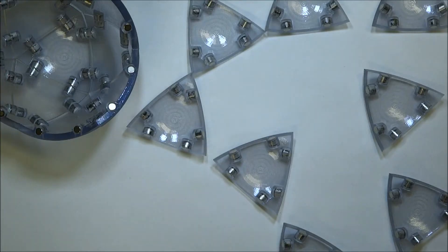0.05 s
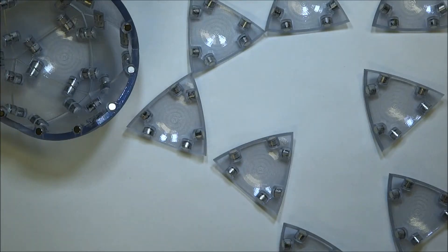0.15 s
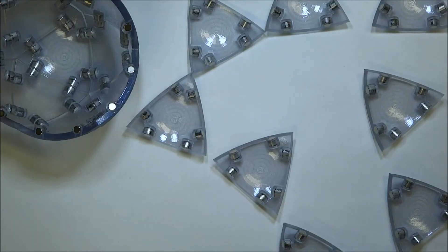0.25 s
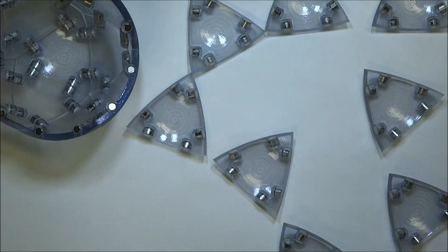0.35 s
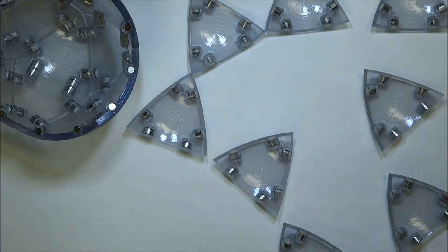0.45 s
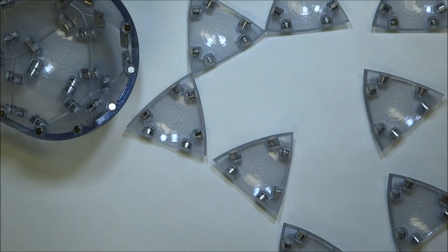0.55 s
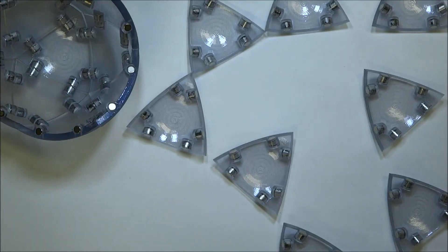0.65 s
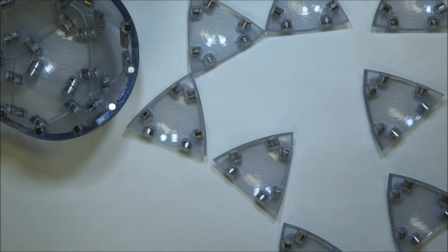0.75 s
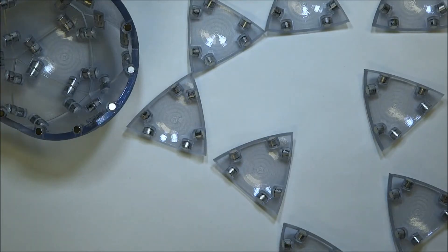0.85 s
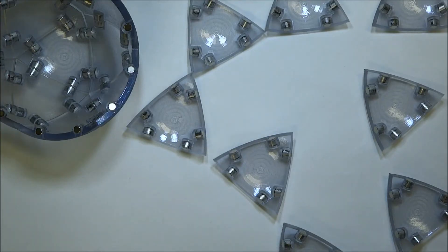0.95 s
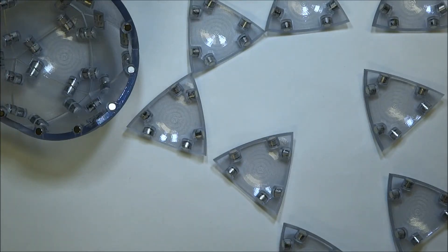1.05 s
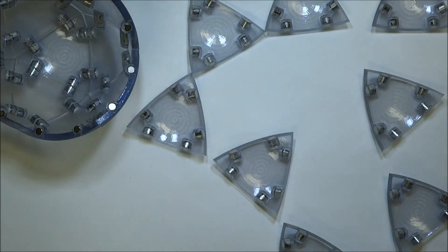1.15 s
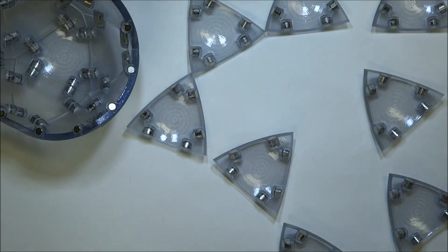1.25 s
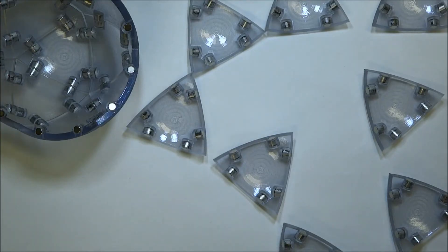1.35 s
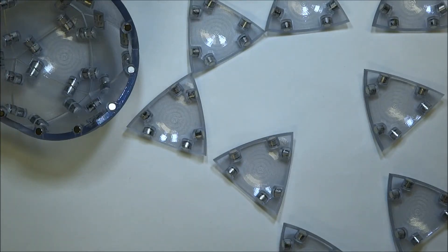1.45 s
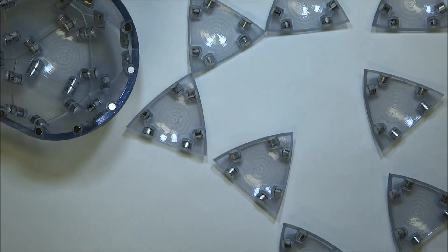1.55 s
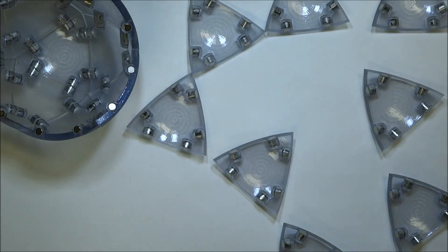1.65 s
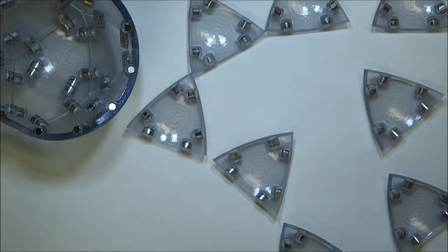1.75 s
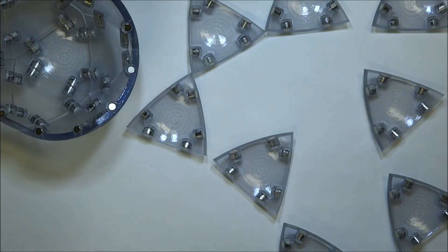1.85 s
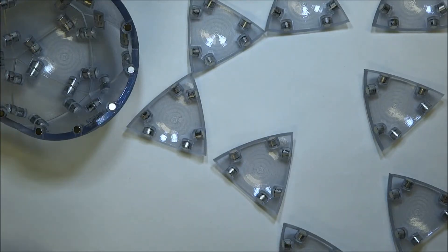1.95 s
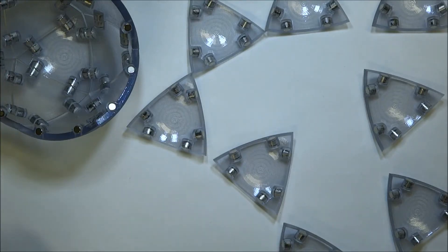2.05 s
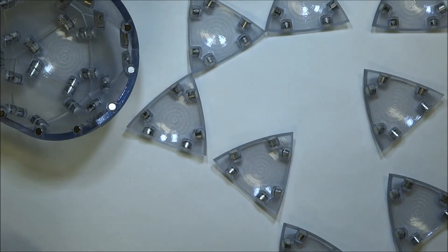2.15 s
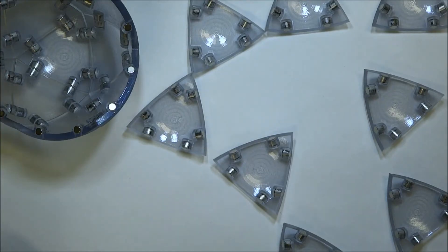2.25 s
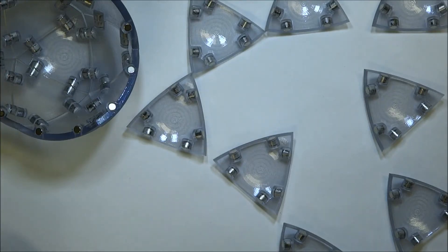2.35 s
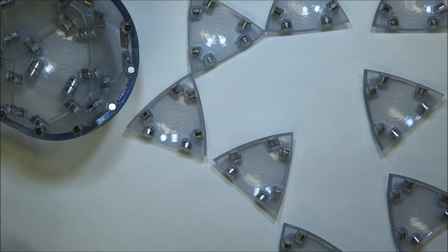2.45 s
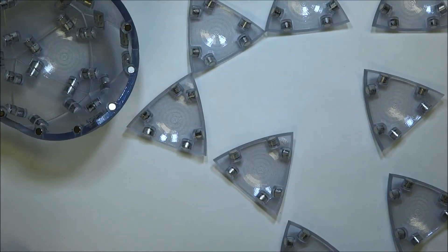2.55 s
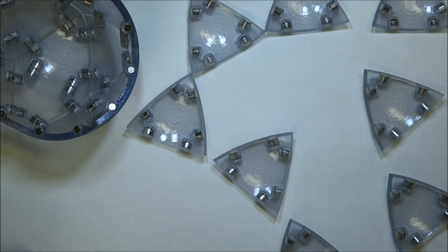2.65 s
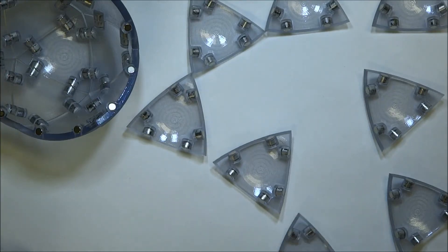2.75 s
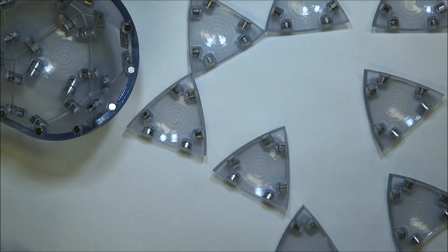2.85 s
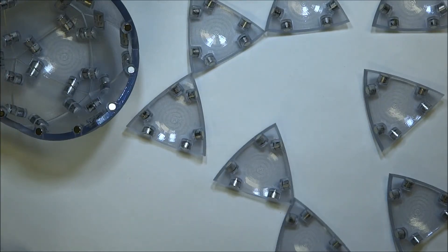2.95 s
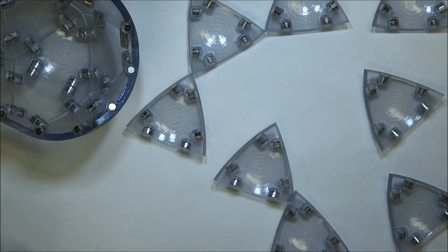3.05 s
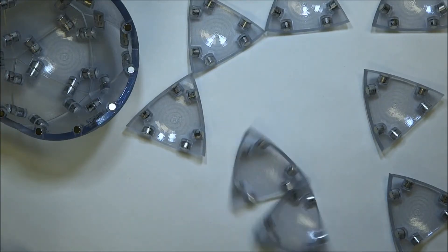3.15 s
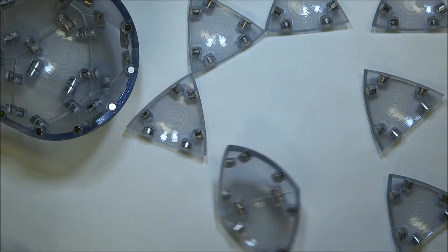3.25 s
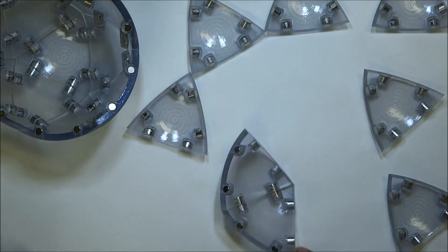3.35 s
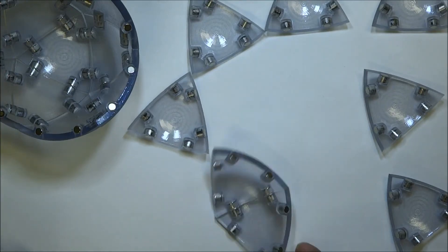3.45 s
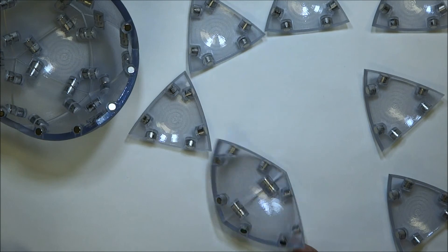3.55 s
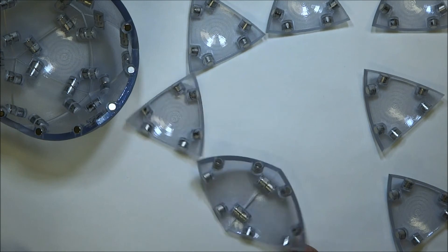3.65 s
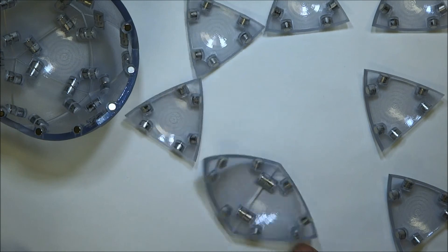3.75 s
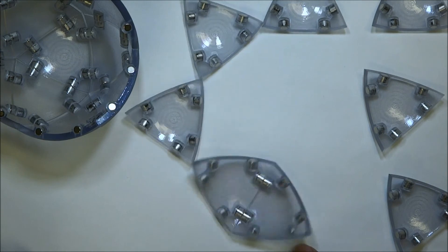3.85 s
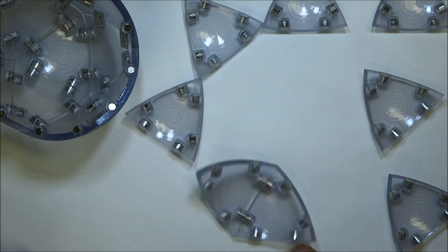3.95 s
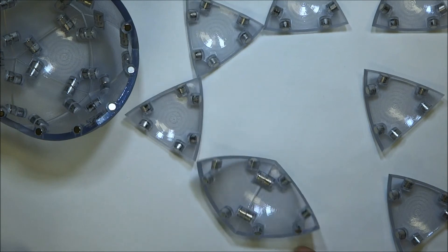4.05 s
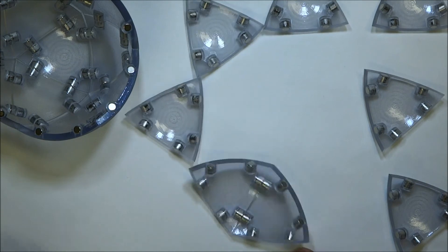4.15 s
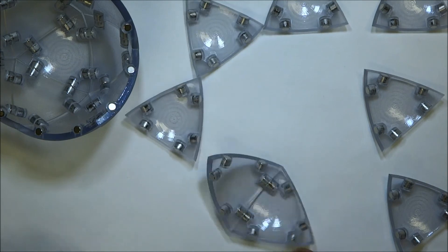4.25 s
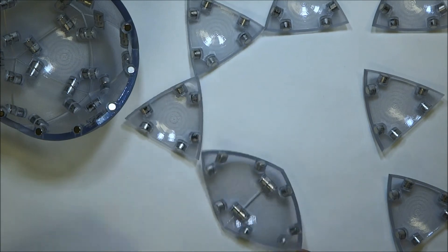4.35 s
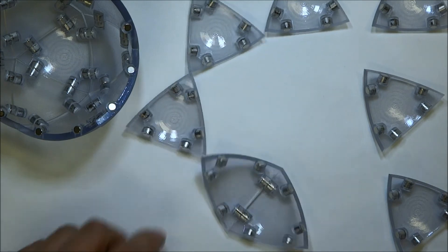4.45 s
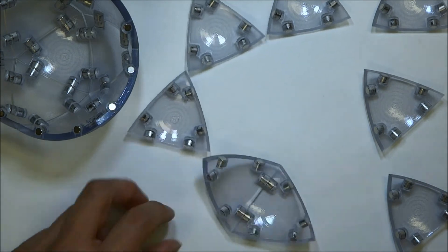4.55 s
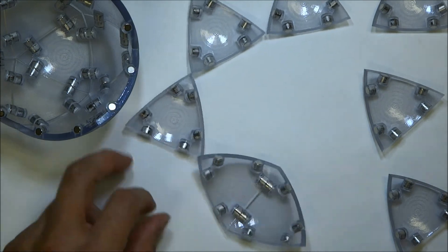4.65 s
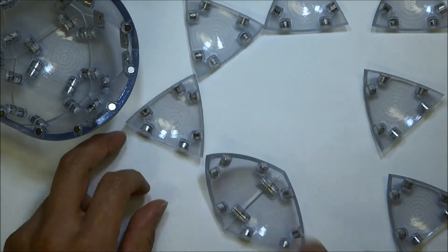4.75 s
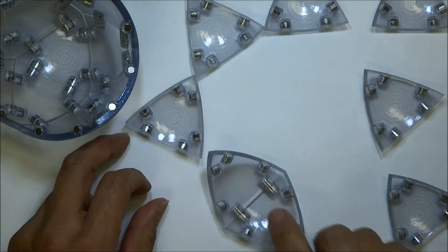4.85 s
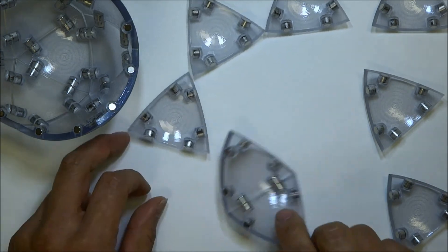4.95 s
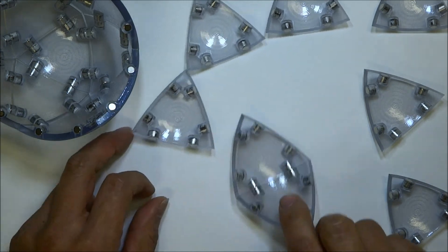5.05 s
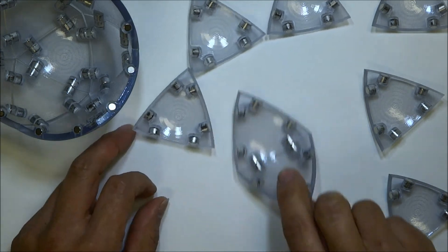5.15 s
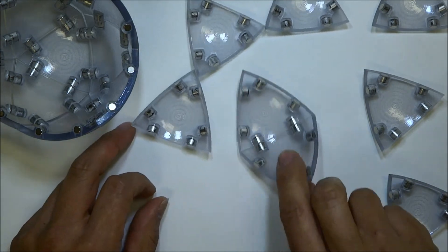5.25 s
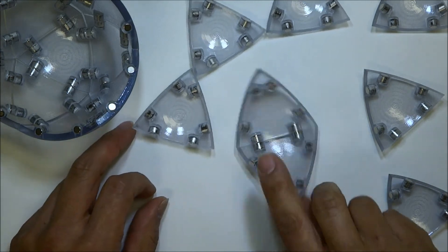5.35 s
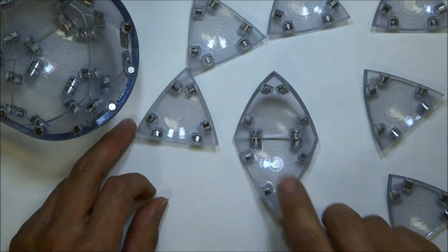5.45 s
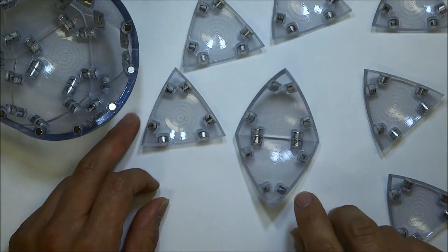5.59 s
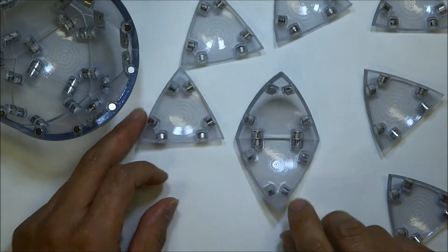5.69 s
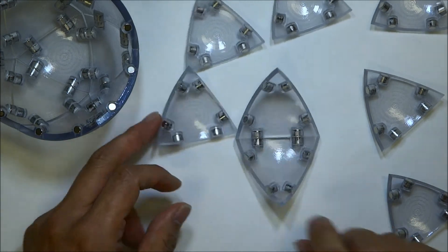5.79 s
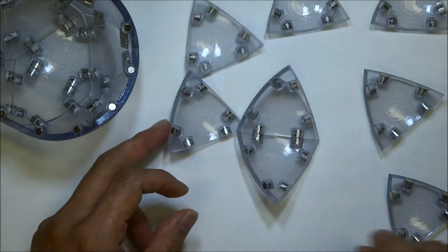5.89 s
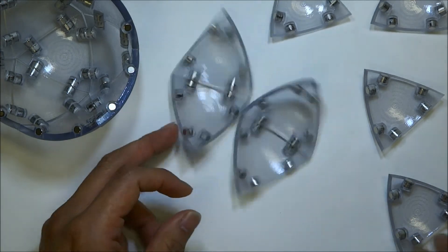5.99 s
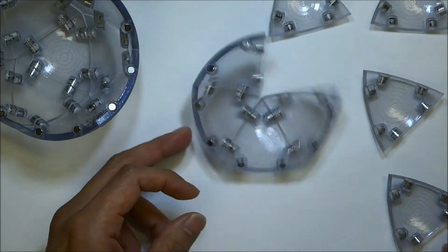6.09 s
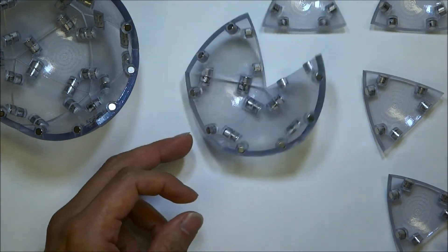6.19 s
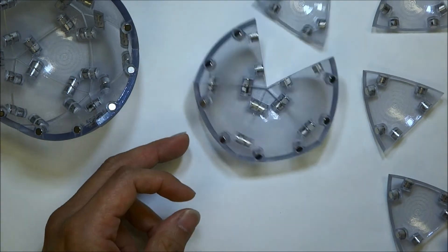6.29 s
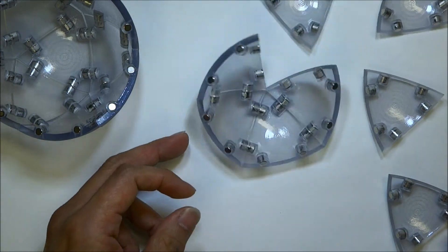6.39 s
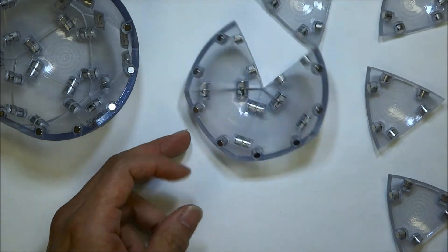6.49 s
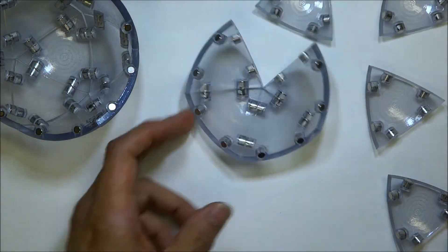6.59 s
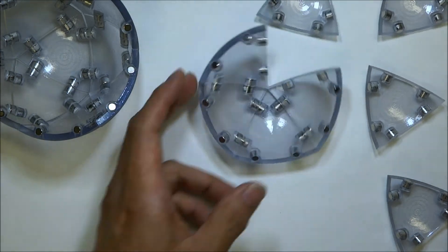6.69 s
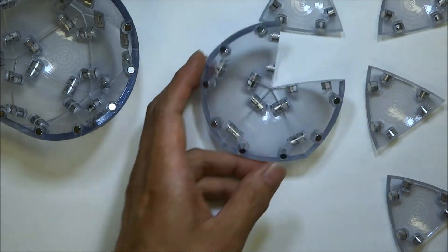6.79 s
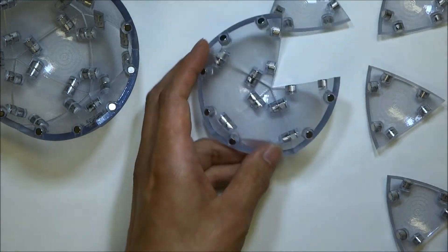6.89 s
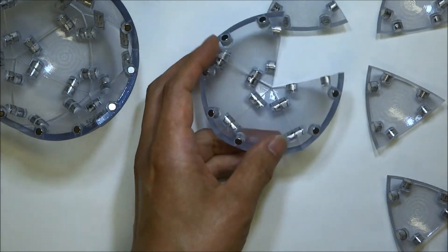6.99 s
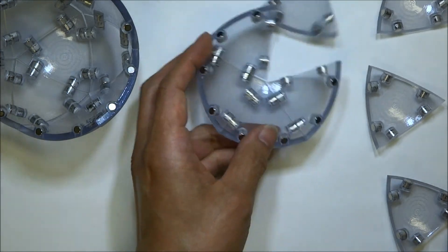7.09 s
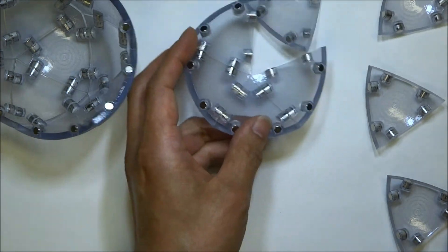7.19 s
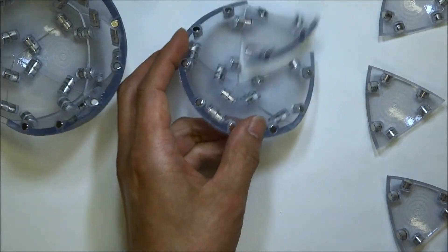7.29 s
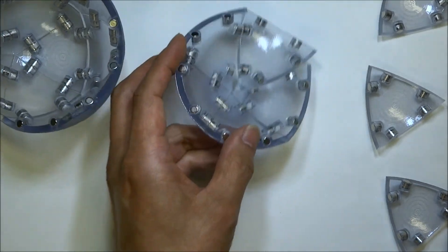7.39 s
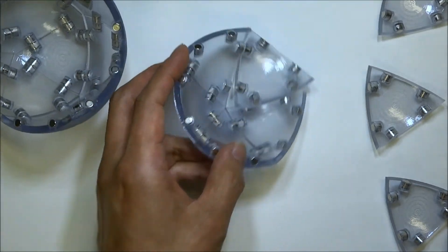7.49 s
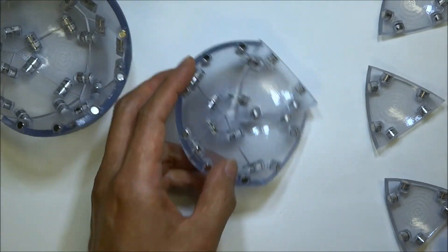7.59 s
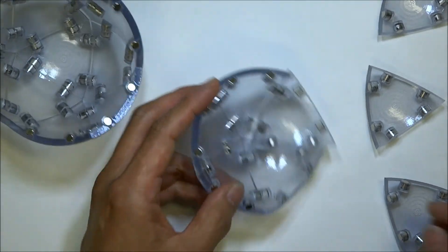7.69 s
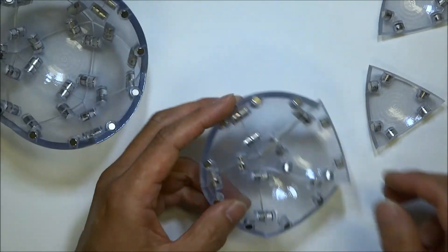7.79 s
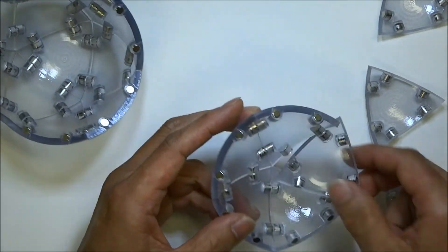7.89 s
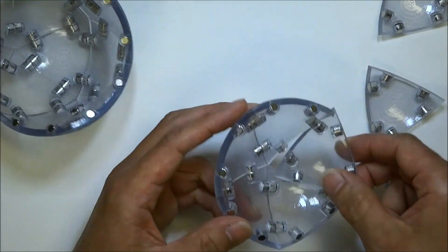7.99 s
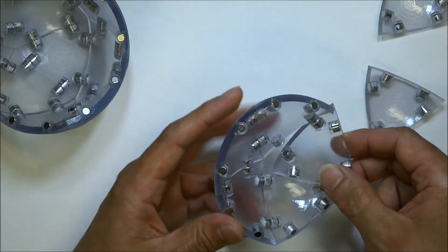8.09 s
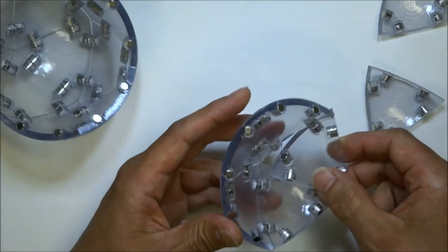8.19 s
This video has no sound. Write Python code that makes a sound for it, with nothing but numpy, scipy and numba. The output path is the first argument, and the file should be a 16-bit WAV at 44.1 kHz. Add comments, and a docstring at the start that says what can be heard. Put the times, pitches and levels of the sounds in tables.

```python
"""Curved plastic panels with steel magnets snap together, and rock and tap on a tabletop: each blow excites
decaying modes of plastic, magnets and table. Fingers and panels slide with dense, uneven slips of noise.
A machine fan hums and hisses nearby, as coloured air noise; thin wavering tones lie in the background.
A small hard room answers the handling with dense, decaying noise echoes.
The camera limits the loud snaps and then turns its gain down, recovering slowly."""
import sys
import numpy as np
from scipy import signal
from scipy.fft import rfft, irfft, next_fast_len
from scipy.io import wavfile
from scipy.ndimage import uniform_filter1d, minimum_filter1d
from numba import njit

SR = 44100
rng = np.random.default_rng(int(sys.argv[2]) if len(sys.argv) > 2 else 0)


def gain_from_db(level_db):
    """Convert decibel levels to linear amplitude factors (20 dB per decade)."""
    decades = np.asarray(level_db, float) / 20
    return 10 ** decades


def dump_mix(stems):
    """Bounce the given channels to the path in sys.argv[1] as a 16-bit WAV at rate SR."""
    frames = np.atleast_2d(stems).T  # one column per channel
    limited = np.clip(frames, -1, 1)  # hard clip at full scale
    pcm = np.round(limited * 32767).astype(np.int16)
    wavfile.write(sys.argv[1], SR, pcm)


N = 362943
T = np.arange(N) / SR


def along(table, hz):
    """Reads a table's second column on a log-frequency axis."""
    table = np.array(table)
    return np.interp(np.log(hz + 1), np.log(table[:, 0] + 1), table[:, 1])


def coloured(x, gain_db):
    """Weights the spectrum by a function of Hz that gives dB."""
    size = next_fast_len(len(x))
    hz = np.arange(size // 2 + 1) * SR / size
    return irfft(rfft(x, size) * gain_from_db(gain_db(hz)), size)[:len(x)]


def unit(x):
    """Scales to rms 1."""
    return x / np.sqrt(np.mean(x ** 2))


def walk(rate_hz):
    """Slow random drift of rms 1: random steps at the given rate, smoothed twice."""
    hold = int(SR / rate_hz)
    steps = np.repeat(rng.standard_normal(N // hold + 1), hold)
    smooth = uniform_filter1d(uniform_filter1d(steps, hold), hold)
    return unit(smooth[:N])


def fan():
    """Stereo air noise with casing humps, wider in the middle range, drifting slightly in level."""
    # spectrum of the air noise before level setting: pitch_hz, density_db (per Hz, relative)
    air_colour = [(15, -49), (25, -7.5), (64, -11), (120, -5.5), (255, -8), (425, -11), (486, -14),
                  (691, -16), (881, -12.5), (1040, -19), (1280, -25.5), (3780, -26.5), (5230, -21.5),
                  (11100, -30), (14000, -32), (15800, -40.5)]
    # casing humps on that spectrum: pitch_hz, width_hz (at half the dB height), height_db
    casing_humps = [(109.6, 24.6, 9.7), (353.6, 11.7, 6.8), (885, 48.5, 10), (957, 36, 8.2),
                    (1450, 520, 6.16), (2365, 51, 6.5), (4440, 160, 1.3), (10920, 150, 5.9)]
    # stereo width of the air: pitch_hz, side_minus_mid_db
    air_width = [(60, -28), (110, -16), (200, -10.5), (380, -4.5), (700, -8.5), (1290, -3.5), (2380, -4),
                 (4400, -7.5), (8120, -13), (15000, -13.5)]
    air_db = -34  # rms of the mid

    def colour(hz):
        humps = sum(height_db / (1 + (2 * (hz - centre) / wide) ** 2) for centre, wide, height_db in casing_humps)
        return along(air_colour, hz) + humps

    mid = coloured(rng.standard_normal(N), colour)
    side = coloured(rng.standard_normal(N), lambda hz: colour(hz) + along(air_width, hz))
    air = (mid + np.array([side, -side])) / np.sqrt(np.mean(mid ** 2))
    return gain_from_db(air_db + .5 * walk(2.57)) * air


def background_tones():
    """Thin sines whose level and pitch waver independently at random."""
    # thin wavering tones in the background: pitch_hz, level_db (rms, before wavering), waver_hz
    tone_rows = [(127.6, -38, 4.23), (429, -46.5, 1.084), (520, -56.5, 1.56), (866, -47, 4.99),
                 (3880, -78, 1.5), (4735, -55.5, 1.22), (5030, -65.5, 1.14), (4980, -67, 0.89),
                 (15720, -113, 3)]
    out = np.zeros(N)
    for pitch_hz, level_db, waver_hz in tone_rows:
        level = np.sqrt(2) * gain_from_db(level_db + 2.5 * walk(12))
        phase = 2 * np.pi * np.cumsum(pitch_hz + waver_hz * walk(8)) / SR
        out += level * np.sin(phase)
    return out


def slides():
    """Dense uneven slips that swell and fade; a brighter slide trades the dull part for the bright one."""
    # slides of finger and panel: start_s, loudest_s, end_s, level_db (swell top, before the brightness
    # trade), brightness_db (added to the bright part, taken from the dull); loudest past end: cut while rising
    slide_times = [(2.86, 2.95, 2.97, -52, 0.8), (3.0, 3.033, 3.12, -51, -4), (3.15, 3.25, 3.28, -52, -3),
                   (4.388, 4.435, 4.52, -43, -6), (5.03, 5.077, 5.18, -44.5, 5),
                   (5.215, 5.246, 5.4, -44.5, -7), (5.76, 5.838, 5.8, -48, -4),
                   (5.94, 6.026, 6.1, -47.5, -5), (7.105, 7.126, 7.2, -44.5, -5),
                   (7.237, 7.287, 7.34, -47.5, -1.5), (7.87, 7.892, 7.92, -46, -8),
                   (7.91, 7.99, 8.1, -43, -2.5)]
    edge_db = -15  # where the rounded swell starts and finishes, relative to its top

    unevenness_db = rng.exponential(size=N) + 3.0 * walk(150)
    slips = rng.standard_normal(N) * gain_from_db(unevenness_db)
    dull = unit(coloured(slips, lambda hz: -8 * np.log2((hz + 1) / 6200) ** 2))
    bright = unit(coloured(slips, lambda hz: -14 * np.log2((hz + 1) / 12000) ** 2))
    out = 0
    for start, loudest, end, level_db, brightness_db in slide_times:
        position = np.interp(T, (start, loudest, end), (-1, 0, 1))
        swell = gain_from_db(level_db + edge_db * position ** 2) * (T > start) * (T < end)
        out = out + swell * (gain_from_db(-brightness_db) * dull + gain_from_db(brightness_db) * bright)
    return out


def ring(modes, tilt_db, rattle_db, rattle_s):
    """One blow: modes add in power; rattling loose parts add a broad copy of each and smear the attack."""
    scatter_db, detune, widen = 2.93, 0.01, 4  # random spread of level and pitch (ratio); width of broad copy
    hz, db, t60 = np.transpose(modes)[:, :, None]
    chance = rng.standard_normal((2, len(modes), 1))
    db = db + tilt_db * np.log2(hz / np.median(hz)) + scatter_db * chance[0]
    hz = hz * (1 + detune * chance[1])

    # each mode is a resonance peak whose width follows from its decay
    f = np.arange(1, 2 ** 12 + 2) * SR / 2 ** 13
    half_width = np.log(1000) / (2 * np.pi * t60)
    broad_width = widen * half_width
    peaks = 1 / ((f - hz) ** 2 + half_width ** 2)
    peaks = peaks + gain_from_db(rattle_db) ** 2 / ((f - hz) ** 2 + broad_width ** 2)
    # a small part radiates little under its own pitch, and the contact is too soft to reach far over it
    slopes = np.minimum(f / hz, 1) ** 2.5 * np.minimum(hz / f, 1) ** 0.59
    power = np.sum((gain_from_db(db) * slopes * SR / 30) ** 2 * peaks, axis=0)

    # the causal response with that spectrum, from the folded cepstrum
    cepstrum = irfft(np.log(power) / 2)
    cepstrum[1:2 ** 12] *= 2
    cepstrum[2 ** 12 + 1:] = 0
    response = irfft(np.exp(rfft(cepstrum)))[:int(.1 * SR)]

    # tiny knocks, even in colour before they fade, spread the push over a moment
    short = T[:int(4 * rattle_s * SR)]
    push = rfft(rng.standard_normal(len(short)) * np.exp(-short / rattle_s))
    push = irfft(push / np.abs(push), len(short)) * np.exp(-short / rattle_s / 2)
    return np.convolve(response, push)[:len(response)]


def strike(panel_db, tilt_db, ping_db, magnet_db, table_db):
    """Panel, its one long-ringing mode, magnets and tabletop sound together; hard blows rattle more."""
    # resonances of each part: pitch_hz, level_db (relative, before tilt and scatter), t60_s
    panel_modes = [(1430, -8, 0.0096), (1705, -8, 0.0088), (2200, -4.5, 0.0068), (2620, -5.5, 0.012),
                   (3330, -1.3, 0.018), (3510, -3.5, 0.0078), (3870, -2, 0.017), (4090, -5, 0.012),
                   (4430, -3, 0.011), (5210, -6, 0.017), (6300, -12, 0.0051)]
    ping_modes = [(3205, 0, 0.044)]
    magnet_modes = [(7070, 4.5, 0.015), (8040, -7, 0.011), (9000, -7, 0.0065), (9600, -3, 0.0072),
                    (11120, 0, 0.011), (12300, -5.5, 0.0098), (13400, -5, 0.0061), (14400, -1, 0.0071)]
    tabletop_modes = [(107, -10, 0.044), (197, -18, 0.027), (273, -6, 0.061), (358, -6, 0.034),
                      (450, -3, 0.026), (581, -2, 0.046), (770, 1, 0.017), (948, 2.5, 0.015),
                      (1230, -8, 0.025), (1520, -8, 0.022)]
    # spread of a blow's push on each part: time constant_s, by part name
    push_s = dict(panel=.0014, ping=.0004, magnet=.0012, tabletop=.003)

    panel = ring(panel_modes, tilt_db, 7 + 0.24 * panel_db, push_s["panel"])
    ping = ring(ping_modes, 0, 5.9, push_s["ping"])
    magnet = ring(magnet_modes, 0.15 * tilt_db, 7.1, push_s["magnet"])
    tabletop = ring(tabletop_modes, 0.64 * tilt_db, 7.8, push_s["tabletop"])
    return gain_from_db(panel_db) * panel + gain_from_db(ping_db) * ping + gain_from_db(magnet_db) * magnet + gain_from_db(table_db) * tabletop


def place(hits):
    """Lays (start_s, strike) pairs on the timeline; overlapping rings add."""
    out = np.zeros(N + SR)
    for start_s, hit in hits:
        first = int(start_s * SR)
        out[first:first + len(hit)] += hit
    return out[:N]


def taps():
    """A panel tip touches down and pings: a soft contact with magnets 11 dB below the panel setting."""
    # touchdowns: start_s, ping_db, panel_db, tabletop_db (gains on the modes)
    tap_times = [(3.0328, -18, -33, -20), (3.6926, -1, -13, -15.5), (7.28, -21, -24, -25),
                 (7.3931, -17, -22, -38)]
    hardness_db = -6  # per octave, on the panel modes
    return place((start_s, strike(panel_db, hardness_db, ping_db, panel_db - 11, table_db))
                 for start_s, ping_db, panel_db, table_db in tap_times)


def knocks():
    """A rocking panel knocks on the table; ping and magnets are set 12 and 11 dB below the panel."""
    # knocks: start_s, tabletop_db, panel_db (gains on the modes), hardness_db_per_octave (panel modes)
    knock_times = [(3.076, -22.5, -45, -5.5), (3.247, -18, -40, -2.5), (3.254, -17, -40, -9),
                   (3.62, -17, -47, -7.5), (3.705, -4.5, -20, 1.5), (3.717, -14.5, -33, -3),
                   (5.241, -29, -33, -4), (5.861, -9, -22.5, -0.8), (5.878, -15, -40, -4),
                   (5.895, -14, -25, -1.5), (5.921, -12.5, -30, -4), (5.979, -17, -27, -0.5),
                   (6.0247, -13.5, -20, 3), (6.035, -8, -17.5, -0.8), (6.089, -39, -19, -9),
                   (6.271, -1.5, -20, 0.7), (6.594, -16.5, -53, -12), (7.0, -24, -52, -18)]
    return place((start_s, strike(panel_db, tilt_db, panel_db - 12, panel_db - 11, table_db))
                 for start_s, table_db, panel_db, tilt_db in knock_times)


def snaps():
    """Snaps and ticks of edge on edge strike plastic and magnets; the ping is set 12 dB below the panel."""
    # contacts: start_s, panel_db, hardness_db_per_octave (panel modes), magnet_db, tabletop_db (mode gains)
    snap_times = [(3.290, 1, 3, 4, -9.5), (3.2952, 12, 11.5, -4, -11.5), (3.303, -11, 8, -15, -20),
                  (3.323, 2, 5, 0, -6.5), (3.3995, 11, 2.5, -6, -1), (3.413, 1, 13.5, -26, -11.5),
                  (4.401, -24.5, 14, -24, -50), (4.455, -29, 14, -33, -45), (4.995, -28, 5, -36, -38),
                  (6.1025, 14, 7.5, 14.5, -10), (6.1078, 0, 4.5, 1.2, -9.5), (6.178, -4, -0.5, -13, -2),
                  (6.187, -7, -2, -17, -14.5), (6.1945, 6, 0, -4, -9), (6.2048, 14.5, 5, 5, -17),
                  (6.220, -6, -2, -20, -10), (6.2579, 10, -9, -5.5, -4.5), (6.984, -16.5, -7, -21.5, -21.5),
                  (7.128, -22.5, -6, -30, -47), (7.325, -22, -6, -31, -39), (7.4179, 0.5, 2.5, -8.5, -35),
                  (7.890, -31, -6, -25, -48), (7.9374, -29, 6, -24, -31)]
    return place((start_s, strike(panel_db, tilt_db, panel_db - 12, magnet_db, table_db))
                 for start_s, panel_db, tilt_db, magnet_db, table_db in snap_times)


def room(x):
    """Echoes begin at the first wall, thicken quickly and die at a different rate in each band."""
    # echo bands: pitch_hz (centre), t60_s, level_db (relative), side_minus_mid_db
    echo_bands = [(122, 0.27, 5, -23), (276, 0.5, -3.5, -6), (500, 0.55, -2, -13), (1114, 0.38, 0, -12),
                  (1960, 0.36, -4, -14.5), (4170, 0.3, -11.5, -11), (8450, 0.36, -9.5, -13),
                  (14000, 0.19, -5.5, -15)]
    first_wall_s, build_s = 0.00097, 0.0037

    t = T[:int(.7 * SR)]
    build = 1 - np.exp(-np.maximum(t - first_wall_s, 0) / build_s)
    echo = 0
    for centre_hz, t60_s, level_db, side_db in echo_bands:
        def band(hz):
            return -12 * np.log2((hz + 1) / centre_hz) ** 2
        mid = coloured(rng.standard_normal(len(t)), band)
        side = coloured(rng.standard_normal(len(t)), band)
        fade = gain_from_db(level_db - 60 * t / t60_s) * build
        fade = fade / np.sqrt(np.mean(mid ** 2) * SR / centre_hz) / 20
        echo = echo + fade * (mid + gain_from_db(side_db) * np.array([side, -side]))
    return signal.fftconvolve(x[None], echo, axes=1)[:, :N]


def scene():
    """Centred handling sounds, their stereo echoes, the fan and the background tones."""
    near = slides() + taps() + knocks() + snaps()
    balance = gain_from_db(np.array([[.2], [-.2]]))  # left slightly louder
    return near + room(near) + (fan() + background_tones()) * balance


@njit
def gain_control(peak, top, release, loud, dive, hold, recover):
    """Limiter with instant attack; a slow gain sinks while loud, waits, then climbs at a fixed dB rate."""
    gain, held, slow, quiet = np.empty(len(peak)), 0., 0., 0.
    for i in range(len(peak)):
        held = max(peak[i] * np.exp(-slow), held * release)
        quiet = 0. if held > loud else quiet + 1.
        slow += dive * np.log(max(held / loud, 1.))
        slow = max(slow - (recover if quiet > hold else 0.), 0.)
        gain[i] = np.exp(-slow) * min(1., top / (held + 1e-9))
    return gain


def top_cut(x):
    """Nothing passes above the cut-off."""
    return signal.sosfilt(signal.butter(12, 16510, fs=SR, output="sos"), x)


def record(dry):
    """The limiter looks a moment ahead, so the sound dips just before a snap and the echoes swell after it."""
    ahead = int(0.00074 * SR)  # 0.74 ms
    peak = -minimum_filter1d(-np.abs(dry).max(axis=0), 2 * ahead + 1)
    release = np.exp(-1 / (0.0066 * SR))  # 6.6 ms time constant
    # slow gain, in natural-log units: 1.5 per second per unit of excess down, 0.55 per second up
    gain = gain_control(peak, top=0.85, release=release, loud=0.14,
                        dive=1.5 / SR, hold=.6 * SR, recover=.55 / SR)
    smooth_gain = uniform_filter1d(gain, ahead // 2)
    return top_cut(np.clip(dry * smooth_gain, -1, 1))


dry = scene()
out = record(dry)
dump_mix(out)
```